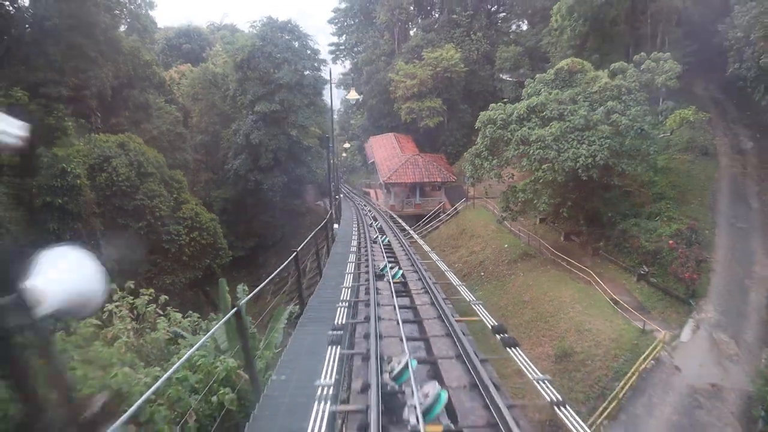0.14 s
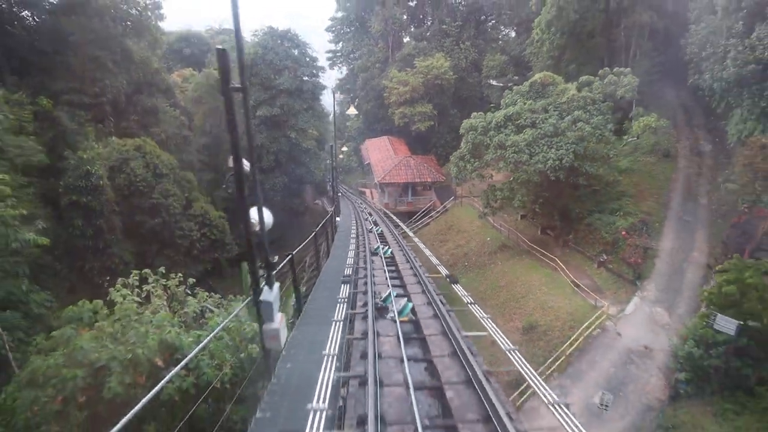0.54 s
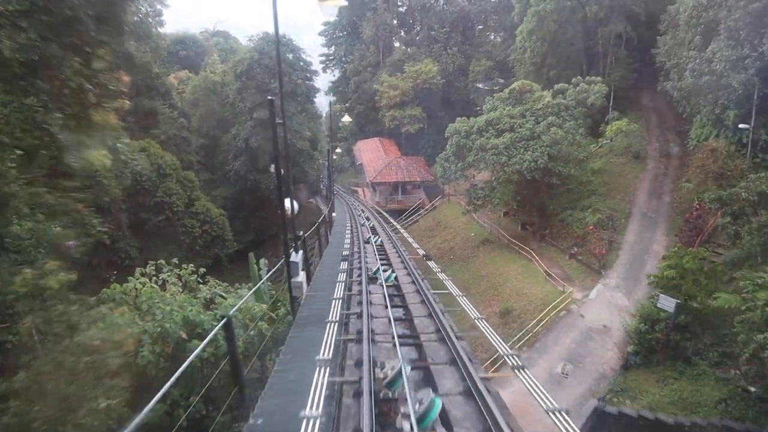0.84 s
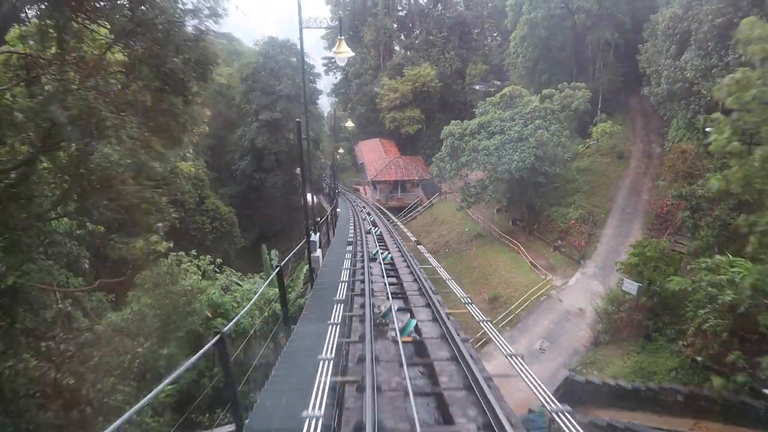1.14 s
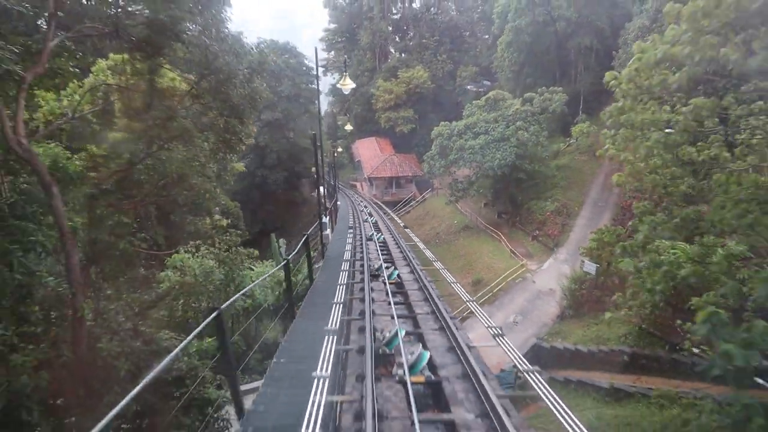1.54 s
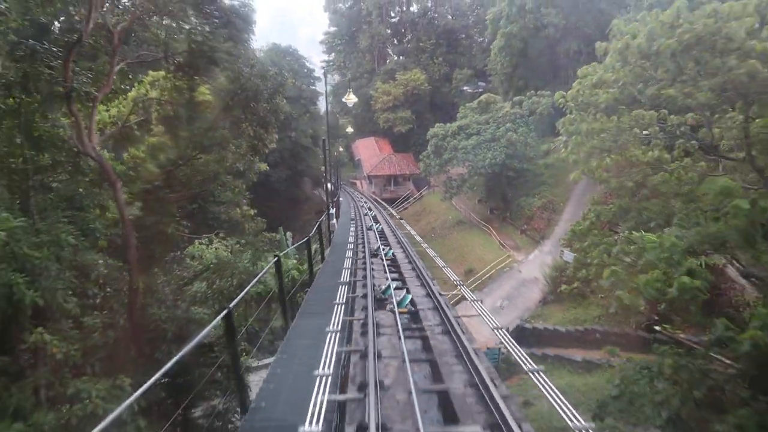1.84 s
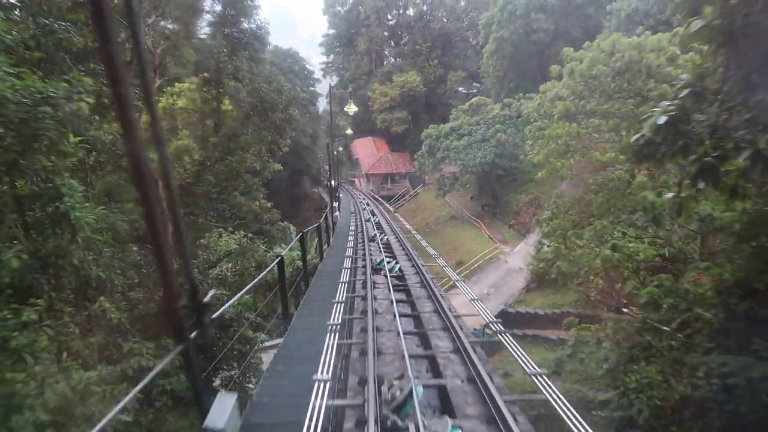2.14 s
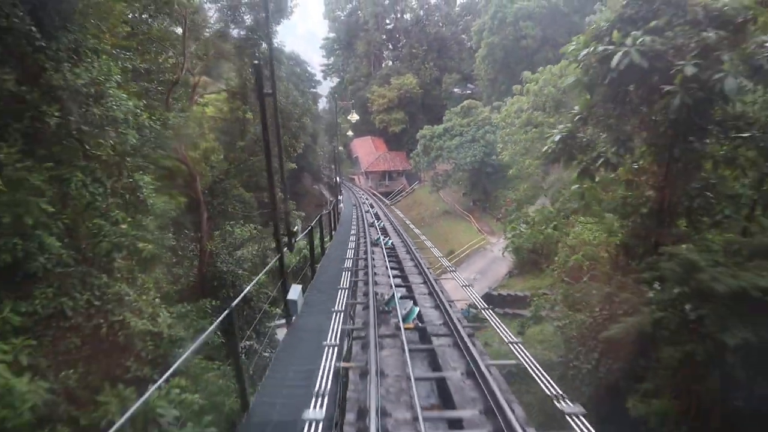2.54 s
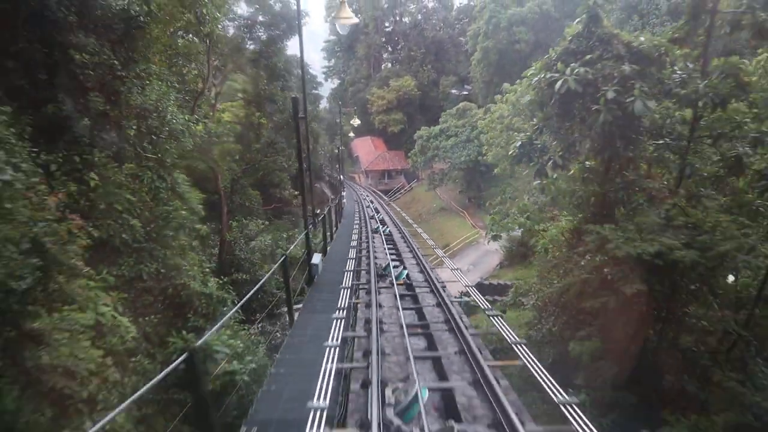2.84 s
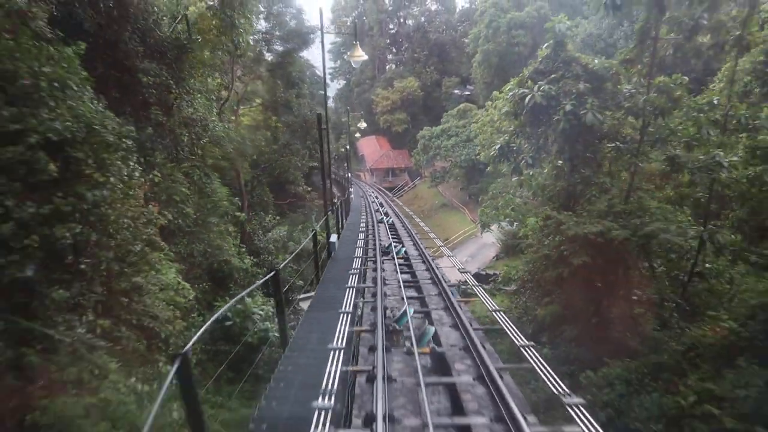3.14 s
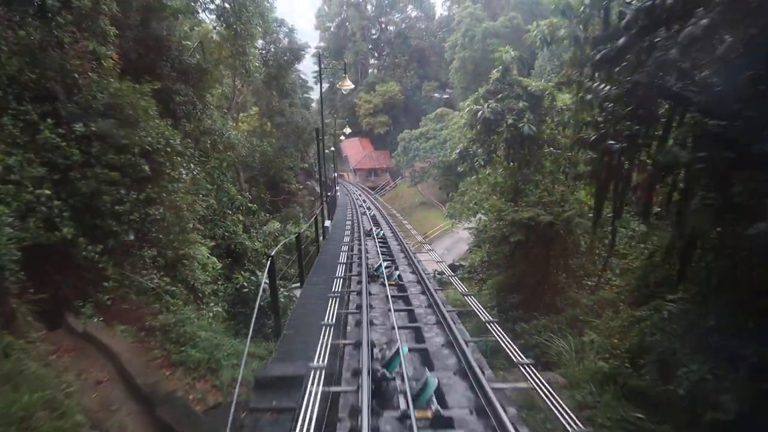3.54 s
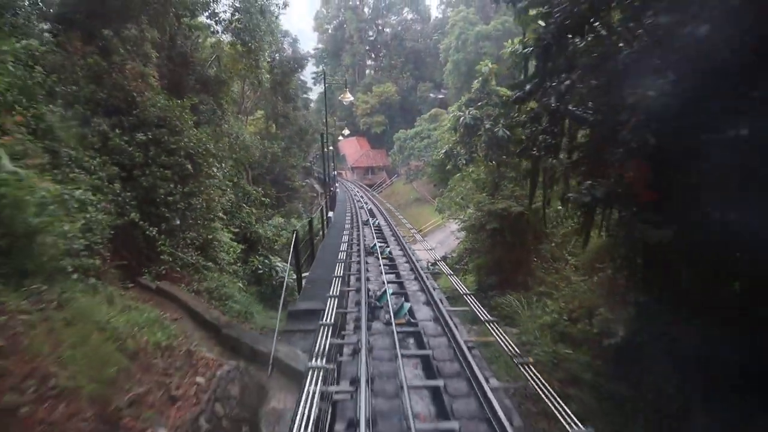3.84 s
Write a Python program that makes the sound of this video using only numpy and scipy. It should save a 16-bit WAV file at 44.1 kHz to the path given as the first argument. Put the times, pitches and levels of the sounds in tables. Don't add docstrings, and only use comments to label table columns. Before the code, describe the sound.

Low rolling rumble inside a climbing funicular cabin, with humming panels, soft bumps and small rattles.

```python
import sys
import numpy as np
from scipy import signal
from scipy.fft import rfft, irfft, next_fast_len
from scipy.io import wavfile
from scipy.ndimage import uniform_filter1d, map_coordinates

SR = 44100
rng = np.random.default_rng(int(sys.argv[2]) if len(sys.argv) > 2 else 0)


def ratio(d):
    e = np.asarray(d, float) / 20
    return 10 ** e


def file_out(sig):
    cols = np.atleast_2d(sig).T
    lim = np.clip(cols, -1, 1)
    pcm = np.round(lim * 32767).astype(np.int16)
    wavfile.write(sys.argv[1], SR, pcm)


N = 175518


def unit(x):
    return x / np.sqrt(np.mean(x ** 2, -1, keepdims=True) + 1e-20)


def along(points, hz):
    f, v = np.transpose(points)
    return np.interp(np.log(hz + 1), np.log(f + 1), v)


def spectrum(points):
    return lambda hz: ratio(along(points, hz))


def wobble(rate_hz):
    return map_coordinates(rng.standard_normal(400), [np.arange(N) * rate_hz / SR])


def bumps(rows):
    t = np.arange(N) / SR
    return sum(height * np.exp(-((t - s) / half_s) ** 2) for s, half_s, height in rows)


def filtered(x, response):
    m = next_fast_len(x.shape[-1] + SR // 2)
    hz = np.fft.rfftfreq(m, 1 / SR)
    return irfft(rfft(x, m) * response(hz), m)[..., :x.shape[-1]]


def modes(table):
    def response(f):
        total = 0
        for k, (hz, width_hz, db) in enumerate(table):
            damping = 1j * f * width_hz
            total = total + (-1) ** k * ratio(db) * damping / (hz * hz - f * f + damping)
        return total
    return response


def rush(response, patchy_db):
    z = signal.stft(rng.standard_normal(N), nperseg=512)[2]
    field = uniform_filter1d(rng.standard_normal(z.shape), 5, 0)
    field = uniform_filter1d(field, 12, 1)
    x = signal.istft(z * ratio(patchy_db * field / field.std()), nperseg=512)[1][:N]
    return unit(filtered(x, response))


def ring_swell(t, rise_s, t60_s):
    return (1 - np.exp(-(t / rise_s) ** 2)) * ratio(-60 * t / t60_s)


def whine():
    # (time [s], half length [s], level [dB])
    whine_bursts = [(.66, .025, -70), (.98, .06, -70), (1.12, .05, -72), (1.26, .05, -72),
                    (1.46, .035, -73), (1.84, .025, -67.5), (2.35, .04, -72), (2.58, .03, -66),
                    (2.74, .05, -67.5), (2.97, .05, -69), (3.19, .04, -68), (3.32, .03, -67.5),
                    (3.64, .04, -73), (3.76, .04, -70.5), (3.92, .03, -71)]
    whine_hz, floor_db = 3401, -79
    t = np.arange(N) / SR
    level = ratio(floor_db) + bumps([(s, half_s, ratio(db)) for s, half_s, db in whine_bursts])
    level = level * ratio(5 + 1.1 * wobble(11))
    line = level * np.sin(2 * np.pi * whine_hz * t + 0.7 * wobble(13))
    return line * ratio([[0], [-3]])


def fitting_rings():
    # (time [s], peak level [dB], frequency [Hz])
    scrapes = [(0.296, -32, 1000), (0.329, -32, 1170), (.569, -25, 622), (.84, -27, 683), (.95, -30, 793),
               (1.055, -23.5, 1012), (1.285, -32.5, 687), (1.891, -33, 990), (2.057, -30, 842),
               (2.475, -20, 638), (2.807, -20, 566), (3.089, -30, 814), (3.151, -23, 638),
               (3.727, -24.5, 997), (3.869, -29, 657), (.229, -56, 3840), (.236, -58, 4260),
               (.24, -50, 1920), (.245, -57, 2970), (.29, -61, 3700), (.37, -62.5, 3500), (.84, -49, 2480),
               (1.929, -53, 2500), (2.94, -55, 4000), (3.425, -43.5, 1810)]
    ring_q, gain_db = 39, -1.5
    out, t = np.zeros(N + SR), np.arange(SR // 4) / SR
    swell = ring_swell(t, rise_s=0.0031, t60_s=0.2)
    for s, db, hz in scrapes:
        tone = modes([(hz, hz / ring_q, 0)])
        scrape = unit(filtered(rng.standard_normal(len(t)), lambda f: tone(f) ** 2))
        out[round(s * SR):][:len(t)] += ratio(db + gain_db) * swell * scrape
    return out[:N]


def trim_clicks():
    # (time [s], peak level [dB], tilt [dB per octave])
    ticks = [(.172, -65, -7), (.228, -62, -7), (.243, -61, -6), (.997, -53, 3), (1.163, -59, 3),
             (1.186, -56, 0), (1.249, -58, -2), (1.303, -60, 0), (1.371, -42, -2), (1.377, -47, -2),
             (1.831, -54, 5), (1.852, -52, 5), (1.904, -49, 4), (1.985, -54, -3), (2.074, -46, 11),
             (2.366, -56, 2), (2.415, -54, 3), (2.460, -56, 4), (2.513, -47, 9), (2.698, -56, 3),
             (2.734, -48, 7), (2.752, -49, 8), (2.832, -50, 12), (2.933, -47, 8), (3.135, -47, 5),
             (3.262, -54, 3), (3.280, -54, 3), (3.335, -55, 3), (3.424, -35, -1), (3.438, -46, -2),
             (3.451, -50, -3), (3.918, -54, 5), (3.930, -54, 5)]
    # (frequency [Hz], level [dB])
    tick_colour = [(500, -60), (1000, -8), (1700, 7), (4000, 3), (9000, 0), (12000, -1), (13800, -12),
                   (16000, -30)]
    rattles_per_s, rattle_db, rattle_spread_db = 20, -70, 2.5
    crack_t60_s, tail_t60_s = 0.02, 0.11
    gain_db, wide_db = -2, 6.5
    out, t = np.zeros((2, N + SR)), np.arange(SR // 5) / SR
    fall = (ratio(-60 * t / crack_t60_s) + ratio(-60 * t / tail_t60_s)) / 2
    chance = rng.random((200, 2))[:int(rattles_per_s * N / SR)]
    rattles = [(u * N / SR, rattle_db - rattle_spread_db * np.log(1 - v), 3) for u, v in chance]
    for s, db, tilt_db in list(ticks) + rattles:
        def colour(hz):
            octaves = np.log2(np.maximum(hz, 2500) / 9000)
            return ratio(along(tick_colour, hz) + tilt_db * octaves)
        burst = filtered(fall * rng.standard_normal((2, len(t))), colour)
        out[:, round(s * SR):][:, :len(t)] += ratio(db + gain_db) * burst
    return out[:, :N] * ratio([[0], [wide_db]])


def scuff_gain():
    # (time [s], half length [s], level [dB])
    scuffs = [(0.245, 0.048, 9.5), (1.468, 0.016, 2), (1.623, 0.034, 5), (2.03, .03, 2), (2.351, .03, 4),
              (2.907, 0.027, 4), (3.072, 0.016, 3), (3.285, 0.02, 8), (3.626, 0.042, 7.5),
              (3.708, 0.023, 7), (3.813, 0.066, 4)]
    return ratio(bumps(scuffs) + 1.0 * wobble(3))


def hiss(swing_db):
    # (frequency [Hz], density [dB per Hz])
    hiss_sum = [(1000, -31), (1900, 2.5), (2600, -3.5), (4000, -11), (5500, -23), (11800, -30.5),
                (13000, -45), (15000, -59)]
    hiss_difference = [(1200, -32), (2100, -2), (2550, -1.5), (3300, -6.5), (5300, -19.5), (12000, -29),
                       (13200, -37.5), (15000, -60.5)]
    hiss_db, wide_db = -22, 3.5
    middle = rush(spectrum(hiss_sum), patchy_db=1.5)
    sides = ratio(wide_db) * rush(spectrum(hiss_difference), patchy_db=-2.0)
    gain = ratio(hiss_db + 0.74 * swing_db + 0.25 * wobble(7.2))
    both = gain * np.array([middle, sides])
    top = filtered(both, lambda f: 1 / (1 + (4500 / (f + 1)) ** 4))
    return both + (scuff_gain() - 1) * top


def cabin_roar(swing_db):
    # (frequency [Hz], density [dB per Hz])
    roar_colour = [(65, -40), (110, -5.5), (220, -7), (410, -14.5), (560, -15.5), (1300, -22), (1700, -33),
                   (2600, -68)]
    # (frequency [Hz], width [Hz], level [dB])
    air_modes = [(648, 78, -3), (995, 66, -4.5), (1180, 50, -5), (1271, 50, -3), (2530, 100, -8)]
    colour, air = spectrum(roar_colour), modes(air_modes)
    return ratio(5 + swing_db) * rush(lambda f: colour(f) * (1 + abs(air(f))), patchy_db=1.22)


def roar_sides(swing_db):
    # (frequency [Hz], density [dB per Hz])
    side_colour = [(71, -39), (120, -16.5), (242, 0), (400, 0), (700, -4), (1330, -6), (1800, -17),
                   (2400, -56)]
    return ratio(-1 + swing_db) * rush(spectrum(side_colour), patchy_db=3.5)


def cabin_panels(swing_db):
    # (frequency [Hz], width [Hz], level [dB])
    panel_modes = [(195.1, 37, -10.5), (242, 17, -9), (288, 18.4, -4.5), (331.6, 13.2, -3.5),
                   (335.7, 50, -7), (375.7, 7.9, -7), (402.8, 19, -8.5), (500, 50, -19.5)]
    resonance = modes(panel_modes)

    def response(f):
        return resonance(f) / (1 + (f / 520) ** 6) / (1 + (150 / (f + 1)) ** 4)

    gain = ratio(11 + 1.22 * swing_db + 1.3 * wobble(5.98))
    return gain * rush(response, patchy_db=-1.8)


def car_frame(swing_db):
    # (frequency [Hz], width [Hz], level [dB])
    frame_modes = [(48.3, 11, 3), (67.4, 26, -0.5), (85, 20.6, 2.5), (99.6, 3.5, -6)]
    resonance = modes(frame_modes)

    def response(f):
        highpass = (f / 30) ** 2 / (1 + (f / 30) ** 2)
        return resonance(f) * highpass / (1 + (f / 130) ** 4)

    gain = ratio(9 + 0.75 * swing_db + 0.61 * wobble(7.8))
    return gain * rush(response, patchy_db=0.16)


def rolling():
    # (time [s], level [dB])
    roll_strength = [(0.0, -36), (0.29, -35), (0.64, -34.5), (0.78, -31.5), (1.33, -32.5), (2.01, -31),
                     (2.34, -31.5), (3.08, -28.5), (3.38, -32), (3.62, -31.5), (3.98, -30.5)]
    roll_db = np.interp(np.arange(N) / SR, *np.transpose(roll_strength))
    mean_db = roll_db.mean()
    swing_db = roll_db - mean_db
    middle = car_frame(swing_db) + cabin_panels(swing_db) + cabin_roar(swing_db)
    return ratio(mean_db) * (np.array([middle, roar_sides(swing_db)]) + hiss(swing_db))


def jolts(rows, gain_db, rise_s, t60_s):
    out, t = np.zeros(N + SR), np.arange(SR // 2) / SR
    swell = ring_swell(t, rise_s, t60_s)
    swell = swell / swell.max()
    for (s, db, hz), turn in zip(rows, rng.random(len(rows))):
        tone = np.sin(2 * np.pi * (hz * t + turn))
        out[round(s * SR):][:len(t)] += ratio(db + gain_db) * swell * tone
    return out[:N]


def track_jolts():
    # (time [s], peak level [dB], frequency [Hz])
    window_jolts = [
        (0.07, -16.5, 399.5),
        (1.202, -16, 410.5),
        (1.412, -20, 421.5),
        (1.952, -9.5, 399.7),
        (2.33, -31, 386),
        (2.923, -18, 395),
        (3.075, -16, 394),
        (3.26, -23, 415.5),
        (3.902, -23, 407.5),
    ]
    roof_jolts = [(0.596, -19.5, 321), (0.839, -13, 329), (1.341, -21, 329.4), (1.475, -19.5, 352.3),
                  (1.98, -14.5, 332.3), (2.157, -15.5, 367), (2.5, -15.5, 321.6), (2.713, -17, 320),
                  (2.832, -17.5, 320.5), (3.206, -18.5, 351), (3.412, -20.5, 367), (3.582, -21, 373.6)]
    floor_jolts = [
        (0.149, -22, 193),
        (0.414, -22.5, 193.3),
        (0.719, -17.5, 165.4),
        (1.103, -19.5, 193),
        (1.335, -17, 187.2),
        (1.829, -22.5, 189),
        (2.619, -21.5, 194.5),
        (2.867, -16.5, 201),
        (3.408, -18.5, 195),
        (3.569, -19, 171.5),
    ]
    panel_jolts = [(0.602, -22, 277), (0.928, -23, 282), (1.074, -3.5, 292.8), (1.168, -9, 310.6),
                   (1.211, -5, 287.6), (1.29, -14.5, 286.8), (1.42, -14.5, 284), (1.527, -5.5, 288),
                   (1.664, -7.5, 290.7), (1.923, -15, 286), (2.024, -6, 296), (2.162, -9, 273.3),
                   (2.33, -8.5, 287.5), (2.59, -10.5, 268.3), (2.738, -8.5, 306.3), (2.827, -20, 281),
                   (3.05, -11.5, 287.5), (3.099, -9.5, 300.6), (3.169, -10, 332), (3.746, -16, 284.6)]
    frame_jolts = [(0.01, -16, 75), (0.13, -15.5, 78), (0.293, -17.5, 91.2), (0.699, -5.5, 75.6),
                   (0.802, -7, 43.4), (0.861, -8.5, 90.7), (1.039, -14, 58.7), (1.8, -15, 41.3),
                   (2.133, -8.5, 43.3), (2.408, -14, 48.4), (2.586, -10, 47.6), (2.795, -17, 70.2),
                   (3.165, -14, 40.8), (3.221, -6.5, 66.6), (3.31, -12.5, 63.8), (3.607, -4, 83.2),
                   (3.681, -11, 72.3), (3.792, -8.5, 52.3), (3.869, -15, 58.8)]
    out = jolts(window_jolts, gain_db=-3, rise_s=0.01344, t60_s=0.425)
    out = out + jolts(roof_jolts, gain_db=-2, rise_s=0.002944, t60_s=0.26)
    out = out + jolts(floor_jolts, gain_db=-3, rise_s=0.01088, t60_s=0.3)
    out = out + jolts(panel_jolts, gain_db=-3, rise_s=0.0064, t60_s=0.25)
    return out + jolts(frame_jolts, gain_db=-3.5, rise_s=0.018, t60_s=0.43)


def scene():
    mid, side = whine() + trim_clicks() + rolling()
    mid = mid + fitting_rings() + track_jolts()
    return np.array([mid + side, mid - side])


def roll_off(x):
    return signal.sosfilt(signal.butter(12, 15900, fs=SR, output="sos"), x)


def record(dry):
    ceiling, hardness = 0.93, 3.3
    soft = dry / (1 + abs(dry / ceiling) ** hardness) ** (1 / hardness)
    return roll_off(soft)


dry = scene()
out = record(dry)
file_out(out)
```